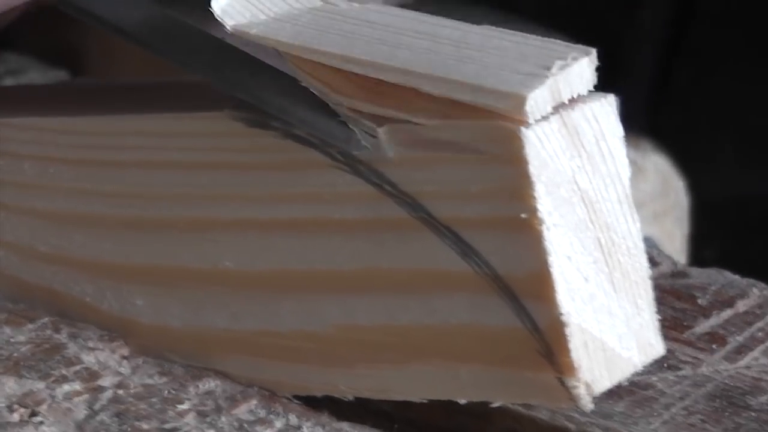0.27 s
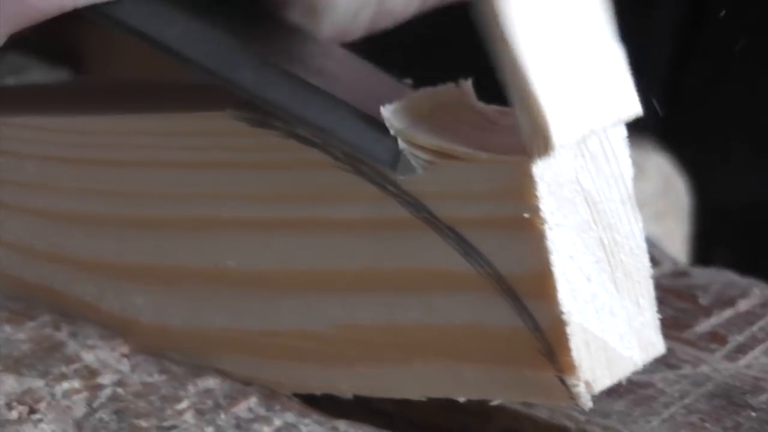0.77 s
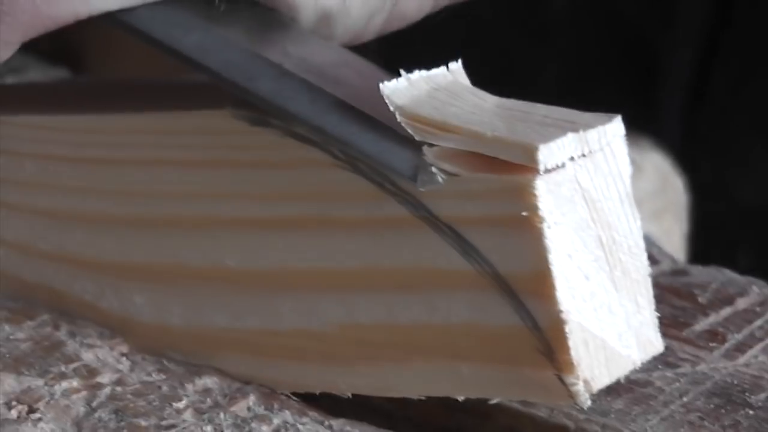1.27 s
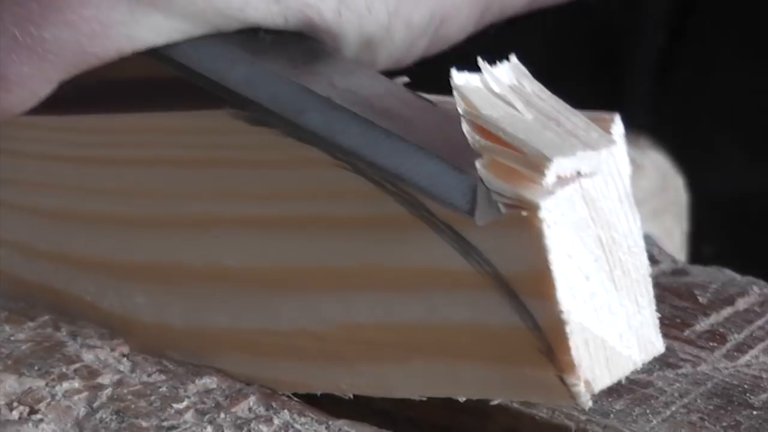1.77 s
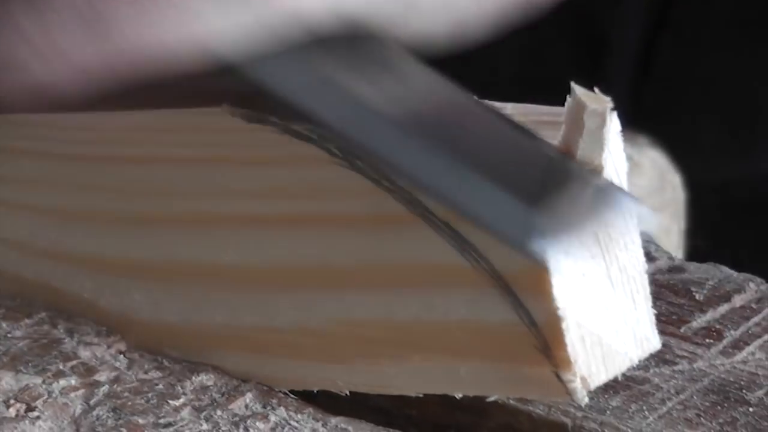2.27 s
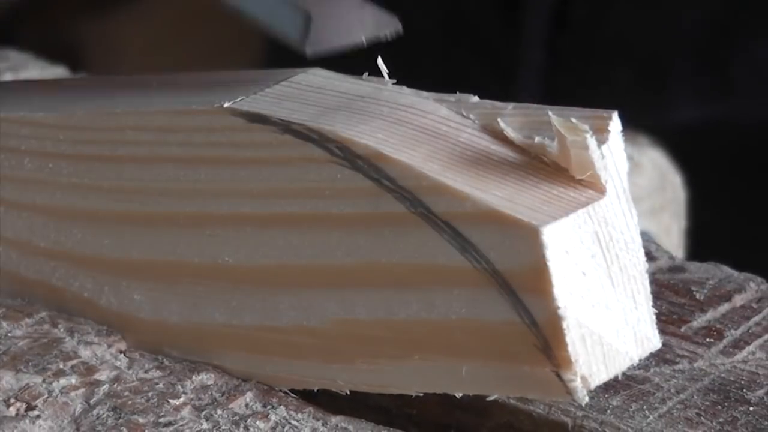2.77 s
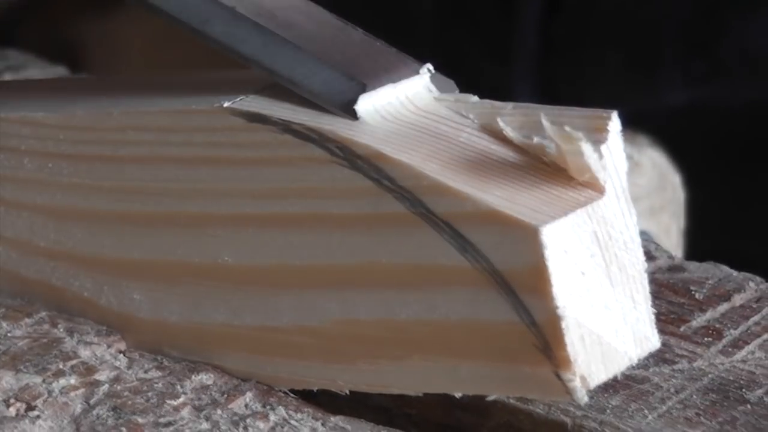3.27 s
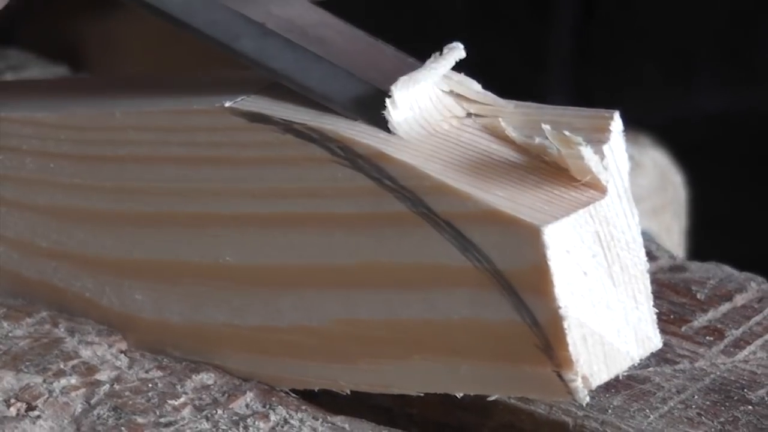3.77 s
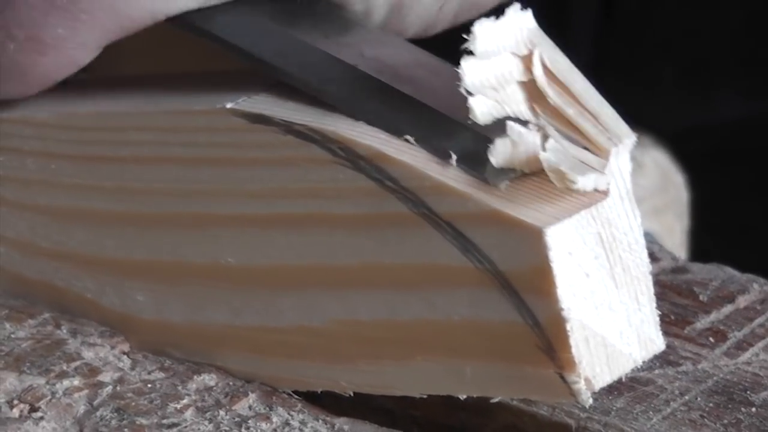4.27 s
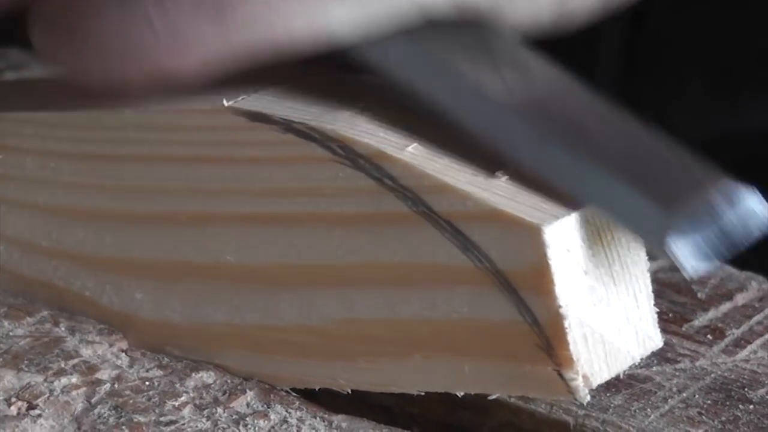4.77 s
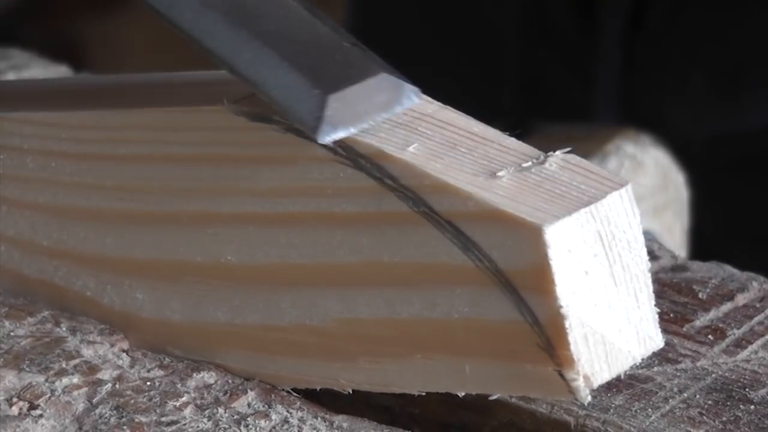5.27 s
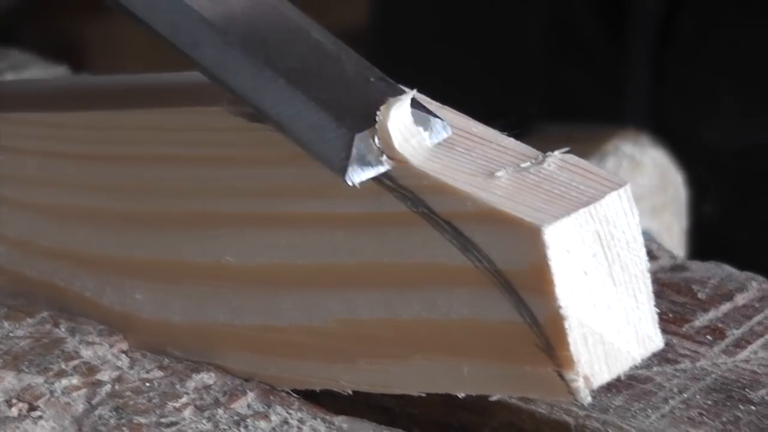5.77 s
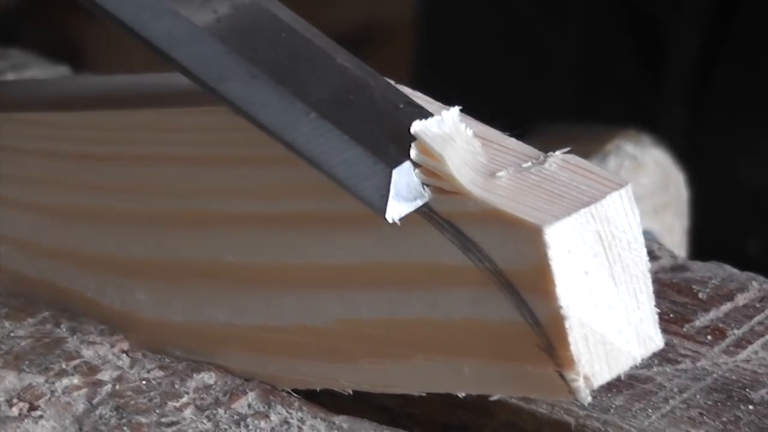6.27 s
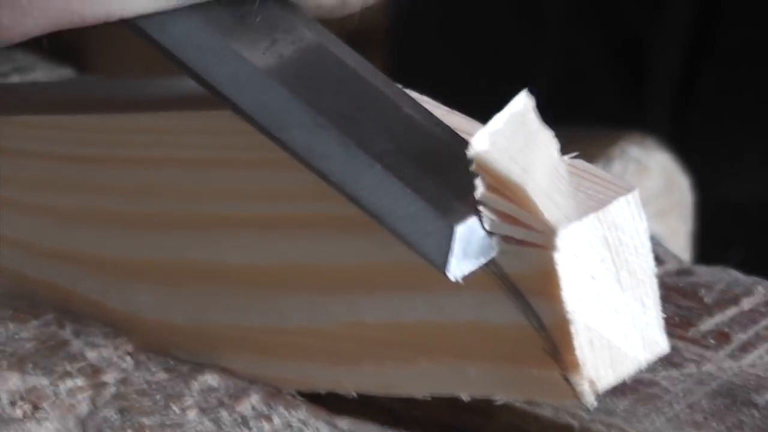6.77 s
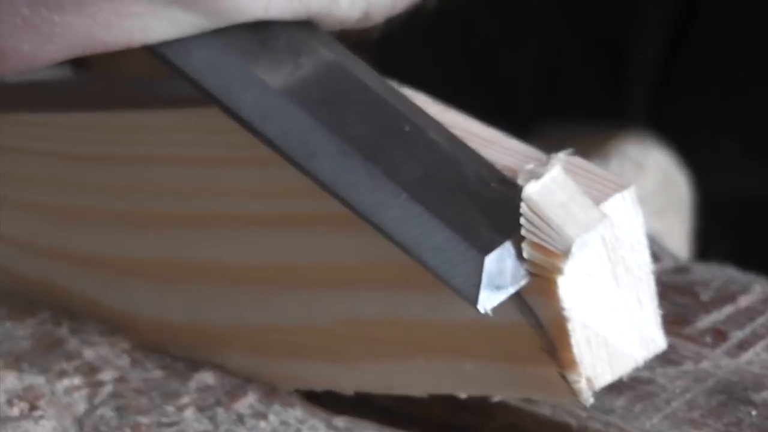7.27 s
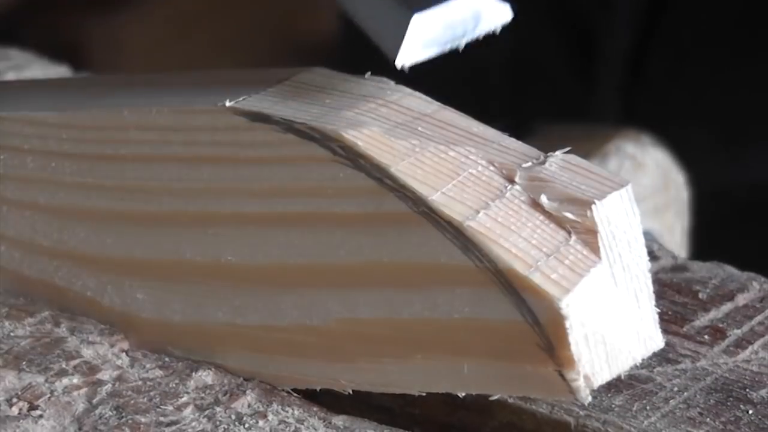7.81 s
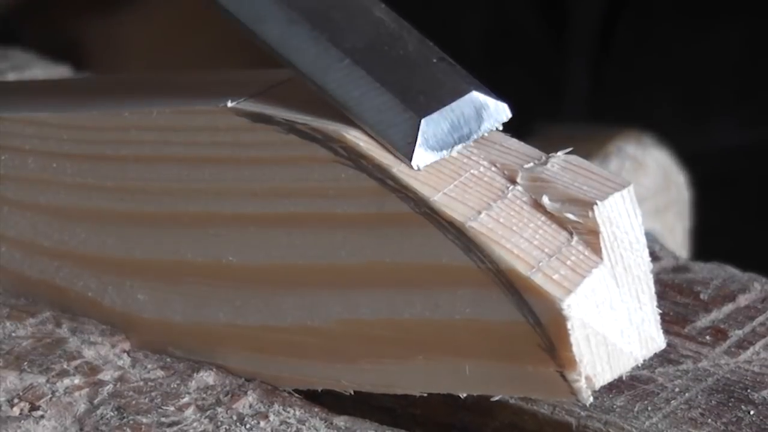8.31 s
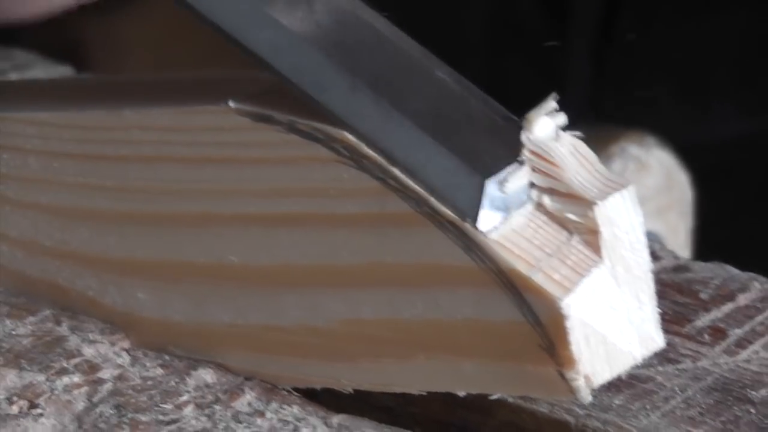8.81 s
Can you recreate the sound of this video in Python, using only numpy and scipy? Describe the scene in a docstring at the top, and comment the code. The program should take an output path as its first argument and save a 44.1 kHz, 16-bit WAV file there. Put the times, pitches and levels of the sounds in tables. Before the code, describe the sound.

Quick mallet blows on a chisel crack and knock into a wooden board, pausing twice for faint blade scrapes and clicks.

```python
"""A small workshop: a mallet drives a chisel through the corner of a pine board, about three blows a second.
Each blow cracks at the steel, knocks in the wood and rings on through board, block and room.
Between blows the block shifts, the sleeve rustles and the tools tick. Splinters snap, loose chips sing,
the block is bumped once, and the blade scrapes as it is set on the wood again.
Behind it: quiet room air and a low hum that swells in the pauses."""
import sys
import numpy as np
from scipy import signal
from scipy.fft import rfft, irfft
from scipy.io import wavfile
from scipy.ndimage import uniform_filter1d

SR = 44100
rng = np.random.default_rng(int(sys.argv[2]) if len(sys.argv) > 2 else 0)


def dump(signal):
    """Clip the signal to [-1, 1] and save it as 16-bit WAV at the path in sys.argv[1]."""
    limited = np.clip(np.atleast_2d(signal).T, -1, 1)
    pcm = np.round(limited * 32767).astype(np.int16)
    wavfile.write(sys.argv[1], SR, pcm)


N = 399105

# mallet blows, levels relative to an average blow:
# start_s, force_db, crack_db, low_ring_db, knock_hz, hollow_hz, hold_db
MALLET_BLOWS = [(0.0136, -.3, -1, 4.5, 1957, 266.5, 4), (0.3626, -0.1, 2, -5, 1196, 748, 6.5),
                (0.72, 1.5, -2.5, 4.5, 1362, 484, 1.5), (1.0723, -1.1, -3.5, -2.5, 1343, 360.4, 10.5),
                (1.4039, 0, 0, -2, 1120, 748, 5.5), (1.736, -0.9, -4.5, 0, 1390, 421, 3.5),
                (2.1002, -1.4, -1.5, -4.5, 1380, 250, -1), (3.291, 2, -2.5, 1, 1490, 490, 2),
                (3.607, 0, -1, -3, 1294, 465, 7), (3.9305, 0.1, 0, -1, 1418, 471, 6.5),
                (4.257, -0.1, -1, 1, 1440, 762, 4.5), (4.598, -2.2, -2, -5, 1152, 669, -1),
                (5.753, 0.5, 1, 2, 1368, 360, 7.5), (6.1183, 0.7, 1, -1.5, 2255, 547, 8),
                (6.47, .3, 0.5, .5, 1405, 344, 7), (6.812, 0, 1, 4.5, 1666, 268.3, 12),
                (7.1523, -0.3, 2, 1.5, 1376, 337, 10.5), (7.505, -0.2, 1.5, 1.5, 1640, 330, 5),
                (8.5024, 2, 1, 3.5, 1645, 367, 8), (8.83, 1.7, 1.5, 2.5, 1317, 278, 8.5)]
# modes of board and block: pitch_hz, level_db
WOOD_MODES = [(166, -5), (209, -5), (269, -11), (312, -4), (355, 2), (419, -1.5), (479, 2.5), (597, -8.5),
              (737, 0.5), (1001, -2), (1114, -8.5), (1248, -12), (1275, 0.5), (1335, -1), (1372, 0),
              (1405, 5.5), (1469, -5.5), (1496, 0.5), (1598, 0), (1679, -1), (2002, -1), (2077, -8),
              (2304, -9.5), (2729, -11), (3278, -25.5)]
# loosened chips: start_s, pitch_hz, level_db, t60_s
LOOSE_CHIPS = [(3.929, 1404, -37, 0.49), (6.470, 1343, -36.5, 0.4), (6.812, 1700, -40, 0.54),
               (7.151, 1396, -29, 0.39), (8.502, 1660, -34, 0.34)]
# steel ringing free as it breaks through the cut: start_s, pitch_hz, level_db, t60_s
STEEL_RINGS = [(2.192, 6300, -57, .7), (4.598, 5700, -38, 0.23)]
# steel on wood, snapping splinters: start_s, level_db, pitch_hz, tilt_db_per_octave, tone_gain
SHARP_CLICKS = [(1.0533, -29.5, 6100, 1.5, 0.71), (1.057, -18.5, 5620, 1.5, 3.8),
                (1.0622, -27.5, 4350, 0.5, .8), (1.584, -43, 6760, 7, 1), (2.0149, -29.5, 2780, 0.5, .5),
                (2.192, -44, 6000, -3, 2.1), (2.2506, -44.5, 6200, -4.5, .8),
                (2.375, -48.5, 3440, 4.5, 0.65), (2.885, -45.5, 2070, -1.5, 1.2),
                (2.9598, -21, 6090, 2.5, 0.99), (4.928, -42.5, 3000, 0, 0.27),
                (5.205, -33, 5770, 1.5, 0.95), (5.6534, -44, 3520, -3, 0.63), (6.617, -35.5, 9130, 1.5, .8),
                (6.7788, -43.5, 6150, -3, .5), (7.692, -44.5, 3820, 1, .5), (7.889, -34.5, 2840, 0.5, 0.43),
                (8.1428, -24.5, 5640, 7, 0.18)]
# bumps against the block: start_s, level_db
BLOCK_BUMPS = [(7.922, -16.5), (7.934, -16.5)]
# mallet swings: lift_s, shift_db, tick_db
MALLET_SWINGS = [(0.1464, -40, -41), (0.499, -43.5, -42), (0.8602, -42, -41), (1.217, -44, -43.5),
                 (1.5585, -43.5, -46.5), (1.906, -46, -50.5), (3.437, -41, -42.5), (3.758, -41.5, -48.5),
                 (4.0854, -41.5, -44), (4.407, -40.5, -44), (5.8912, -33.5, -36.5), (6.2656, -33, -37),
                 (6.6193, -34, -46.5), (6.9911, -38.5, -53.5), (7.3563, -37.5, -57), (7.661, -40.5, -59),
                 (8.666, -30.5, -49.5), (8.993, -32.5, -58)]
# block nudged as the chisel is lifted or set down: start_s, level_db
BLOCK_NUDGES = [(2.344, -44.5), (2.883, -40.5), (5.197, -40.5), (8.1089, -33)]
# blade sliding over wood: start_s, length_s, level_db
BLADE_SLIDES = [(2.147, .27, -56.5), (2.85, 0.25, -57.5), (3.084, 0.38, -57), (4.702, 0.85, -62),
                (5.253, .5, -56.5), (7.826, .7, -54), (8.25, 0.095, -49)]
# resonances of the rubbing blade: centre_hz, width_hz, boost_db
BLADE_MODES = [(2050, 80, 4), (3200, 60, 4), (3660, 110, 3), (6100, 250, 3)]
# spectral shapes: freq_hz, density_db
CRACK_SPECTRUM = [(900, -12.5), (2500, -5), (4000, 1.5), (6000, -2.5), (8000, -8), (12000, -10.5)]
KNOCK_SPECTRUM = [(120, -18), (260, 4), (420, -1.5), (800, 0.5), (1100, -2), (1400, 1), (2200, 1),
                  (2800, -4.5), (5000, -46.5)]
RING_SPECTRUM = [(60, -38), (130, -15), (165, -12.5), (350, -2.5), (600, -2), (900, -3), (1400, -5),
                 (2100, -7), (2520, -16.5), (3300, -15.5), (4300, -22), (6200, -25.5), (8000, -32.5),
                 (12000, -39)]
CLICK_SPECTRUM = [(150, -5.5), (400, 4), (900, 2), (2500, 3), (5500, -1.5), (8000, -3.5), (12000, -7.5)]
BUMP_SPECTRUM = [(29, -42), (50, -23), (188, -0.5), (371, -12.5), (663, -2.5), (931, -13), (1160, -6.5),
                 (1340, -30), (1950, -13), (2120, -13.5), (3160, -30), (6000, -38), (7800, -48),
                 (13200, -120)]
SHIFT_SPECTRUM = [(70, -31.5), (140, -4), (200, 5), (350, 1), (550, -8.5), (900, -13.5), (1800, -15.5),
                  (3500, -30.5), (9000, -51)]
RUSTLE_SPECTRUM = [(30, -25.5), (70, -19), (200, 7), (340, 3), (520, -1.5), (1100, -11.5), (2500, -26.5),
                   (8000, -44)]
SCRAPE_SPECTRUM = [(300, 1.5), (1100, 10.5), (2400, 0.5), (3300, 1), (6000, -5.5), (12000, -13)]
AIR_SPECTRUM = [(15, -59.5), (25, -41), (68, -38), (80, -14), (101, -6), (124, -14.5), (237, -21),
                (1090, -20), (2550, -27.5), (2900, -24.5), (12000, -48), (15600, -78.5), (22000, -120)]
# scattered sound in the side channel: freq_hz, gain_db
SIDE_RESPONSE = [(40, -1), (120, -19), (300, -16), (700, -10.5), (1300, -9.5), (2400, -16), (4500, -54),
                 (9000, -34), (12000, -8)]
# room decay: freq_hz, t60_s
ROOM_DECAY = [(100, 0.42), (300, 0.33), (800, 0.26), (2000, 0.25), (5000, 0.22), (11000, 0.19)]

CRACK_DB, KNOCK_DB, LOW_RING_DB, MID_RING_DB, HIGH_RING_DB = -15.5, -16.5, -33.5, -28.5, -33.5
CRACK_HZ, CRACK_SCATTER = 3546, 0.047
HIGH_PER_CRACK, MID_PER_HOLD, HIGH_PER_HOLD = 0.95, 0.23, 0.47  # dB per dB
TURN_AFTER_BLOW_S, DROP_BEFORE_BLOW_S, MAX_SWING_S = 0.238, 0.044, 0.42
TURN_RE_LIFT_DB, DROP_RE_LIFT_DB = -5.5, -6.5
SLEEVE_LEAD_S, SLEEVE_HOLD_S, SLEEVE_RE_SHIFT_DB, SLEEVE_HISS_DB = 0.21, 0.36, -11.5, -64.5
RUB_ATTACK_S, RUB_RELEASE_S, HAND_RE_SLIDE_DB = 0.03, 0.039, -1.5
HUM_HZ, HUM_DB, HUM_DIP_DB, HUM_RETURN_S = 99.4, -54.5, 26.5, 0.51

EVENT_SAMPLES = 16384
AGE_S, EVENT_HZ = np.arange(EVENT_SAMPLES) / SR, np.fft.rfftfreq(EVENT_SAMPLES, 1 / SR)
TIME_S, BLOW_TIMES_S = np.arange(N) / SR, np.array(MALLET_BLOWS)[:, 0]
ATTACK_SPAN, BODY_SPAN = slice(0, int(0.006 * SR)), slice(int(0.01 * SR), int(0.1 * SR))


def chiselling():
    """Blows, ringing chips and steel, clicks and bumps."""
    out = np.zeros(N)
    for start_s, force_db, crack_db, low_db, knock_hz, hollow_hz, hold_db in MALLET_BLOWS:
        add(out, start_s, strike(force_db, crack_db, knock_hz))
        add(out, start_s, wood_ring(force_db, crack_db, low_db, knock_hz, hollow_hz, hold_db))
    for start_s, pitch_hz, level_db, t60_s in LOOSE_CHIPS:
        add(out, start_s, chip(pitch_hz, level_db, t60_s))
    for start_s, pitch_hz, level_db, t60_s in STEEL_RINGS:
        add(out, start_s, undb(level_db) * tone(pitch_hz) * fade(t60_s, rise_s=0.002))
    for start_s, level_db, pitch_hz, tilt, tone_gain in SHARP_CLICKS:
        add(out, start_s, click(level_db, pitch_hz, tilt, tone_gain, room_db=-8.5))
    for start_s, level_db in BLOCK_BUMPS:
        add(out, start_s, bump(level_db))
    return out


def strike(force_db, crack_db, knock_hz):
    """First milliseconds of a blow: the chisel cracks, then the wood knocks."""
    crack_hz = CRACK_HZ * (1 + CRACK_SCATTER * rng.standard_normal())
    crack = noise(CRACK_SPECTRUM) + 0.69 * tone(crack_hz)
    crack = unit(crack * fade(t60_s=0.011, rise_s=0.0008, delay_s=0.00018), ATTACK_SPAN)
    knock = noise(KNOCK_SPECTRUM) + 0.67 * tone(knock_hz)
    knock = unit(knock * fade(t60_s=0.039, rise_s=0.00034, delay_s=0.0011), ATTACK_SPAN)
    return undb(CRACK_DB + crack_db) * crack + undb(KNOCK_DB + force_db) * knock


def wood_ring(force_db, crack_db, low_db, knock_hz, hollow_hz, hold_db):
    """Board and block ring in a diffuse room tail; the ring holds its level briefly, then dies away."""
    favoured = 0.45 * tone(knock_hz) + 0.36 * tone(hollow_hz)  # set by the place of the cut
    steady = noise(RING_SPECTRUM) + 0.8 * wood_modes() + favoured
    hold = undb(hold_db * np.minimum(AGE_S / 0.083, 1)) * (1 - np.exp(-AGE_S / 0.0025))
    spectrum = rfft(room_tail(steady) * hold)
    mid_db = MID_RING_DB + force_db - MID_PER_HOLD * hold_db
    high_db = HIGH_RING_DB + HIGH_PER_CRACK * crack_db - HIGH_PER_HOLD * hold_db
    above_low, above_mid = (1 - 1 / (1 + (EVENT_HZ / edge_hz) ** 8) for edge_hz in (600, 2500))
    bands = (1 - above_low, LOW_RING_DB + low_db), (above_low - above_mid, mid_db), (above_mid, high_db)
    return sum(undb(db) * unit(irfft(spectrum * share), BODY_SPAN) for share, db in bands)


def wood_modes():
    """Modes of board and block; level and pitch scatter per contact."""
    return unit(sum(undb(db + 2 * rng.standard_normal()) * tone(hz * (1 + 0.005 * rng.standard_normal()))
                    for hz, db in WOOD_MODES))


def thumps():
    """A low thump under each blow and sharp click."""
    out = np.zeros(N)
    for start_s in BLOW_TIMES_S:
        add(out, start_s, thump(level_db=-24))
    for start_s, click_db, *_ in SHARP_CLICKS:
        add(out, start_s, thump(click_db - 8.5))
    return out


def thump(level_db):
    """A short, low, one-cycle thump."""
    widths = (AGE_S - 0.0046) / 0.002  # time from the zero crossing
    return undb(level_db) * widths * np.exp(-widths ** 2 / 2) * np.minimum(AGE_S / 0.0023, 1)


def chip(pitch_hz, level_db, t60_s):
    """A thin tongue of wood rings in two close, beating modes."""
    return undb(level_db) * (tone(pitch_hz) + 1.4 * tone(pitch_hz * 1.03)) * fade(t60_s, rise_s=0.0048)


def click(level_db, pitch_hz, tilt_db_per_octave, tone_gain, room_db):
    """Tiny pitched snap with a room tail; tilt sets its brightness."""
    spectrum = [(hz, db + tilt_db_per_octave * np.log2(max(hz, 1000) / 1000)) for hz, db in CLICK_SPECTRUM]
    snap = (noise(spectrum) + tone_gain * tone(pitch_hz)) * fade(t60_s=0.016, rise_s=0.00016)
    tail = room_tail(noise(spectrum) + 0.15 * tone(pitch_hz)) * (1 - np.exp(-AGE_S / 0.0019))
    return undb(level_db) * unit(snap + undb(room_db) * tail, ATTACK_SPAN)


def bump(level_db):
    """Dull bump on the block: fast decay, faint tail, low thump."""
    envelope = fade(t60_s=0.13, rise_s=0.0019) + 0.12 * fade(t60_s=0.48, rise_s=0.0091)
    return undb(level_db) * soft_contact(BUMP_SPECTRUM) * envelope + thump(level_db - 16)


def handling():
    """Each jerk of a swing shifts the block and ticks the tools twice; the chisel nudges the block."""
    out = np.zeros(N)
    for lift_s, shift_db, tick_db in MALLET_SWINGS:
        for start_s, jerk_db in jerks(lift_s):
            add(out, start_s, block_shift(shift_db + jerk_db))
            level_db, pitch_hz = tick_db + jerk_db, rng.uniform(2300, 7000)
            first = click(level_db, pitch_hz, tilt_db_per_octave=-1.7, tone_gain=0.63, room_db=-10)
            gap_s = rng.uniform(0.023, 0.034)
            second = click(level_db - 17, pitch_hz, tilt_db_per_octave=0, tone_gain=0.6, room_db=-24)
            add(out, start_s, first)
            add(out, start_s + gap_s, second)
    for start_s, level_db in BLOCK_NUDGES:
        add(out, start_s, block_shift(level_db))
    return out


def jerks(lift_s):
    """(start_s, relative_db) of the lift and, if a blow follows soon, the turn and the drop."""
    last_s, coming_s = BLOW_TIMES_S[BLOW_TIMES_S < lift_s][-1], BLOW_TIMES_S[BLOW_TIMES_S > lift_s]
    if len(coming_s) == 0 or coming_s[0] - last_s > MAX_SWING_S:
        return [(lift_s, 0)]
    turn = (last_s + TURN_AFTER_BLOW_S, TURN_RE_LIFT_DB)
    drop = (coming_s[0] - DROP_BEFORE_BLOW_S, DROP_RE_LIFT_DB)
    return [(lift_s, 0), turn, drop]


def block_shift(level_db):
    """The block rocks dully on the bench."""
    return undb(level_db) * soft_contact(SHIFT_SPECTRUM) * fade(t60_s=0.33, rise_s=0.0044)


def soft_contact(spectrum):
    """Noise plus the wood modes that its spectrum reaches."""
    return unit(noise(spectrum) + 0.8 * unit(colour(wood_modes(), spectrum)))


def rubbing():
    """Sleeve and hand rustle; the sliding blade scrapes unevenly and rings in its own modes."""
    swings = [(rub_envelope(s - SLEEVE_LEAD_S, SLEEVE_HOLD_S), db) for s, db, _ in MALLET_SWINGS]
    sleeve = sum(swing * undb(shift_db + SLEEVE_RE_SHIFT_DB) for swing, shift_db in swings)
    hiss = sum(swing for swing, _ in swings) * undb(SLEEVE_HISS_DB)
    slide = sum(rub_envelope(start_s, length_s) * undb(db) for start_s, length_s, db in BLADE_SLIDES)
    rustle = (sleeve + undb(HAND_RE_SLIDE_DB) * slide) * undb(1.7 * wander(30)) * noise(RUSTLE_SPECTRUM, N)
    grit = undb(1.4 * wander(35) + 3 * wander(600)) * noise(SCRAPE_SPECTRUM, N)
    hz = np.fft.rfftfreq(N, 1 / SR)
    blade_db = sum(db * resonance(hz, centre_hz, width_hz) for centre_hz, width_hz, db in BLADE_MODES)
    scrape = irfft(rfft(slide * grit) * undb(blade_db - 1.5), N)
    return rustle + hiss * grit + scrape


def rub_envelope(start_s, length_s):
    """One rubbing movement: attack, hold, release."""
    age_s = np.maximum(TIME_S - start_s, 0)
    return (1 - np.exp(-age_s / RUB_ATTACK_S)) * np.exp(-np.maximum(age_s - length_s, 0) / RUB_RELEASE_S)


def near_surfaces(x):
    """Early reflections from bench and tools ripple the treble."""
    reflections = rng.standard_normal(EVENT_SAMPLES) * fade(t60_s=0.028, rise_s=0.003)
    highpass = signal.butter(4, 2500, "high", fs=SR, output="sos")
    treble = signal.sosfilt(highpass, reflections / np.linalg.norm(reflections))
    return x + 0.25 * signal.fftconvolve(x, treble)[:N]


def room_tail(steady):
    """A steady sound decays as the room does, treble first."""
    spectrum = rfft(steady)
    centres_hz, t60s_s = np.transpose(ROOM_DECAY)
    shares = [along(EVENT_HZ, np.c_[centres_hz, band]) for band in np.eye(len(centres_hz))]
    return sum(irfft(spectrum * share) * fade(t60_s) for share, t60_s in zip(shares, t60s_s))


def air_and_hum():
    """Room air and a wavering hum that dips at each blow and swells back."""
    last_blow = np.maximum(np.searchsorted(BLOW_TIMES_S, TIME_S) - 1, 0)
    since_blow_s = np.abs(TIME_S - BLOW_TIMES_S[last_blow])
    hum_db = HUM_DB - HUM_DIP_DB * np.exp(-since_blow_s / HUM_RETURN_S) + 0.98 * wander(6.5)
    hum_hz = HUM_HZ + 2.5 * wander(27)
    hum = undb(hum_db) * np.sin(2 * np.pi * np.cumsum(hum_hz) / SR)
    return undb(-60.5) * noise(AIR_SPECTRUM, N) + hum


def undb(db):
    """Decibels to gain."""
    return 10 ** (np.asarray(db) / 20)


def unit(x, span=slice(None)):
    """Scale to rms 1 over a span."""
    return x / np.sqrt(np.mean(x[span] ** 2))


def along(hz, points):
    """Interpolate (freq_hz, value) points in log frequency."""
    points_hz, values = np.transpose(points)
    return np.interp(np.log(np.maximum(hz, 1)), np.log(points_hz), values)


def colour(x, spectrum):
    """Filter by (freq_hz, gain_db) points."""
    gain = undb(along(np.fft.rfftfreq(len(x), 1 / SR), spectrum))
    return irfft(rfft(x) * gain, len(x))


def noise(spectrum, samples=EVENT_SAMPLES):
    """Coloured noise, rms 1."""
    return unit(colour(rng.standard_normal(samples), spectrum))


def tone(hz):
    """Sine with random phase."""
    return np.sin(2 * np.pi * (hz * AGE_S + rng.random()))


def fade(t60_s, rise_s=0, delay_s=0):
    """Envelope: delay, rise, exponential decay."""
    age_s = np.maximum(AGE_S - delay_s, 0)
    return (1 - np.exp(-age_s / max(rise_s, 1e-5))) * np.exp(-np.log(1000) * age_s / t60_s)


def resonance(hz, centre_hz, width_hz):
    """Resonance curve, 1 at its centre."""
    return 1 / np.sqrt(1 + (2 * (hz - centre_hz) / width_hz) ** 2)


def wander(rate_hz):
    """Smooth random drift, spread near 1."""
    hold = int(SR / rate_hz)
    steps = np.repeat(rng.standard_normal(N // hold + 1), hold)[:N]
    return 1.3 * uniform_filter1d(uniform_filter1d(steps, hold), hold)


def add(track, start_s, sound):
    """Mix a sound in at start_s."""
    start = max(int(start_s * SR), 0)
    track[start:start + len(sound)] += sound[:N - start]


def scene():
    """The work is straight ahead; scattered sound reaches left and right differently."""
    direct, scattered = (chiselling() + handling() + rubbing() + air_and_hum() for _ in range(2))
    low = thumps()
    mid = near_surfaces(direct) + low
    # thumps reach left and right slightly out of step
    thump_skew = undb(-6) * np.gradient(low) * SR / (2 * np.pi * 80)
    side = colour(scattered, SIDE_RESPONSE) + thump_skew
    return np.array([mid + side, mid - side])


def record(dry):
    """Round the loudest peaks and cut the top."""
    ceiling, cutoff_hz = 0.58, 11750
    rounded = ceiling * np.tanh(dry / ceiling)
    return signal.sosfilt(signal.ellip(8, 0.2, 70, cutoff_hz, fs=SR, output="sos"), rounded)


dry = scene()
out = record(dry)
dump(out)
```